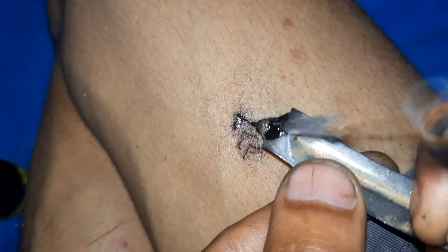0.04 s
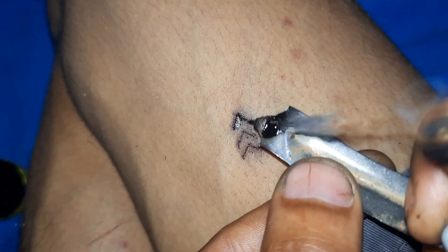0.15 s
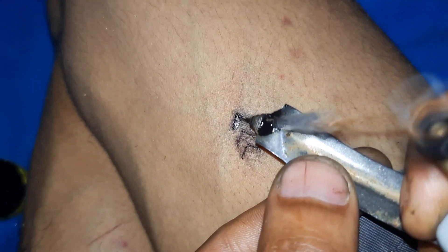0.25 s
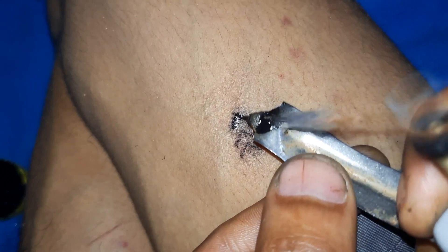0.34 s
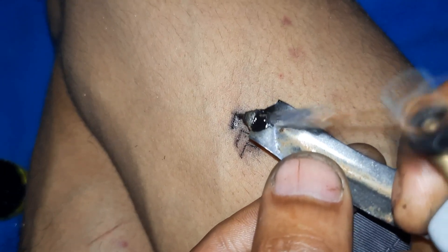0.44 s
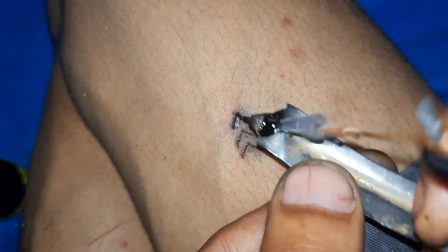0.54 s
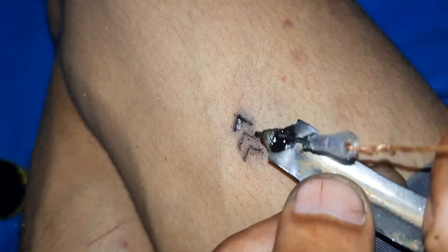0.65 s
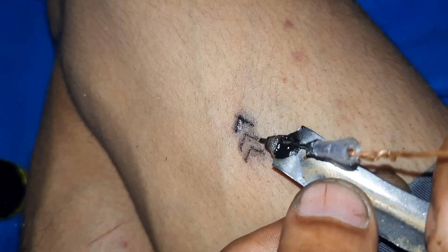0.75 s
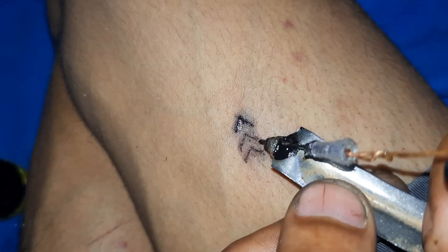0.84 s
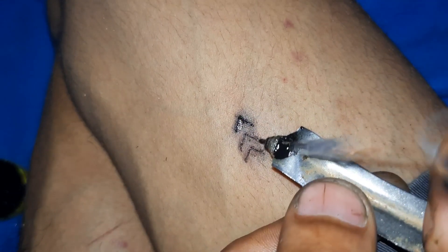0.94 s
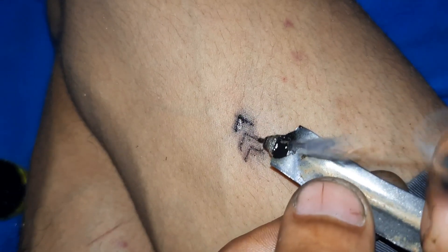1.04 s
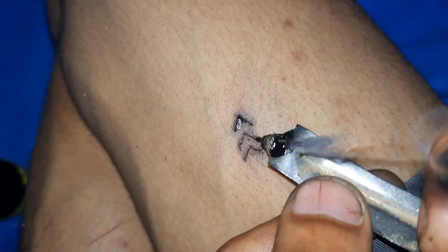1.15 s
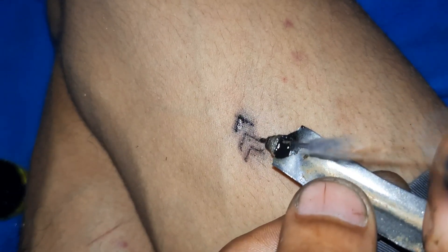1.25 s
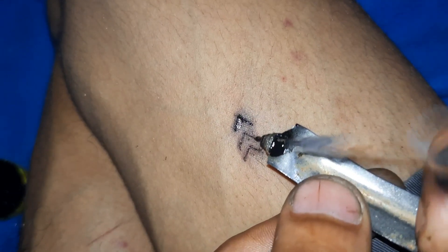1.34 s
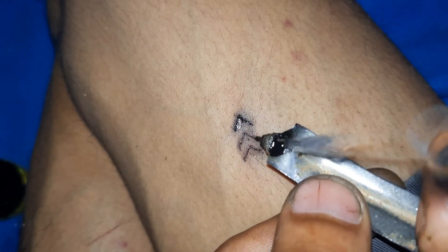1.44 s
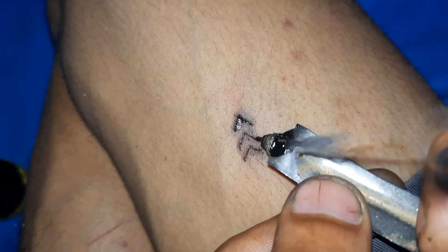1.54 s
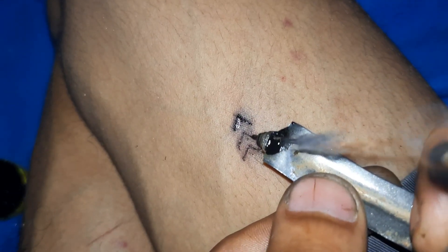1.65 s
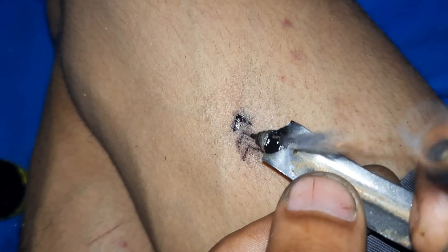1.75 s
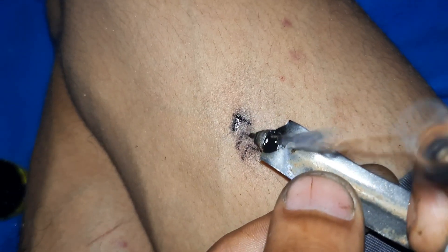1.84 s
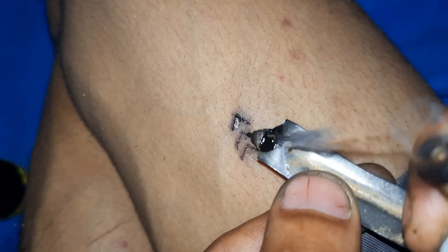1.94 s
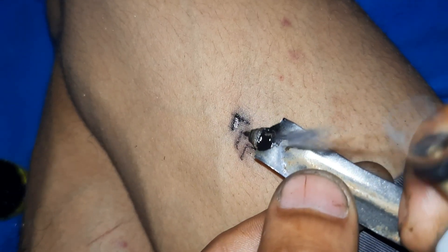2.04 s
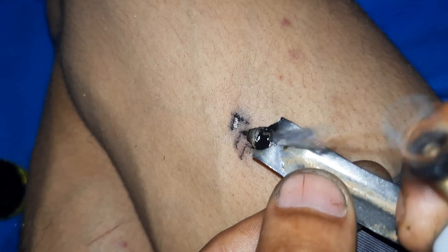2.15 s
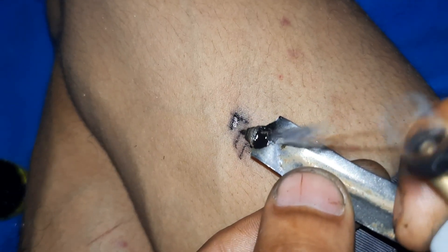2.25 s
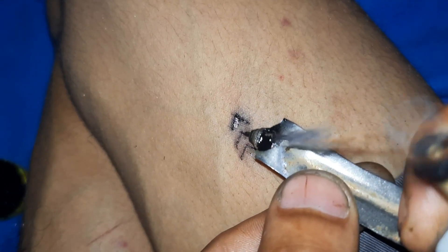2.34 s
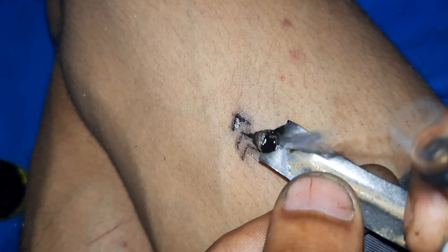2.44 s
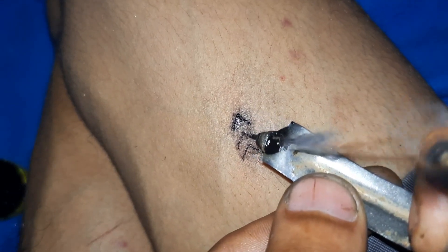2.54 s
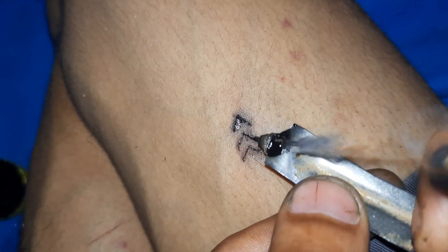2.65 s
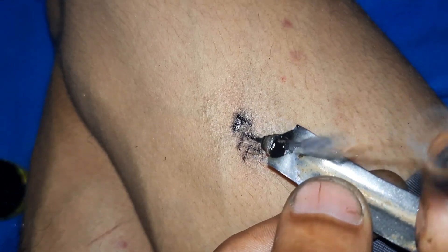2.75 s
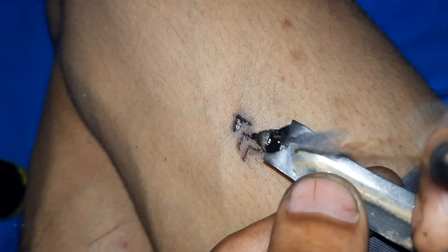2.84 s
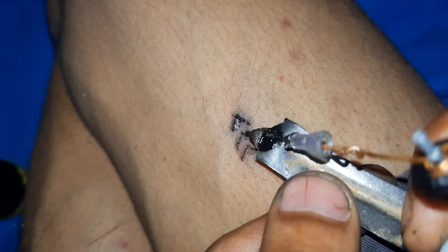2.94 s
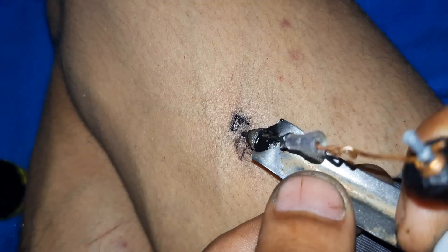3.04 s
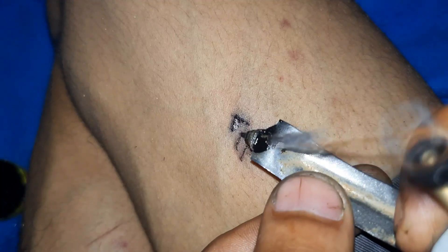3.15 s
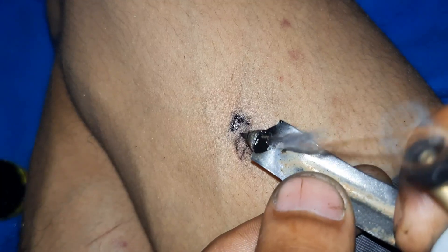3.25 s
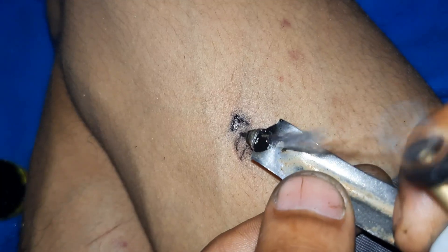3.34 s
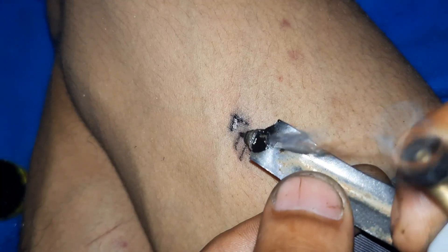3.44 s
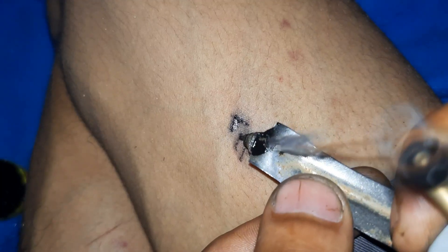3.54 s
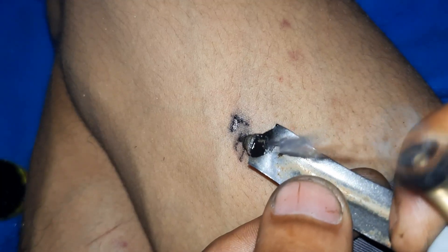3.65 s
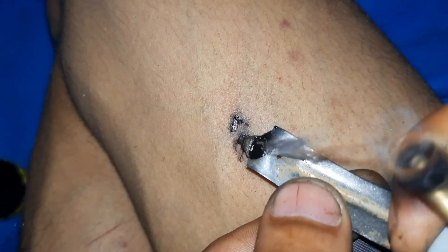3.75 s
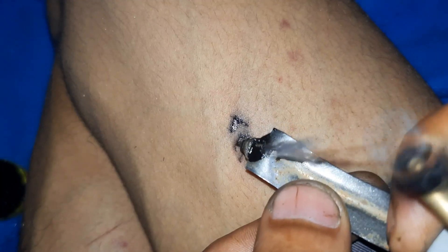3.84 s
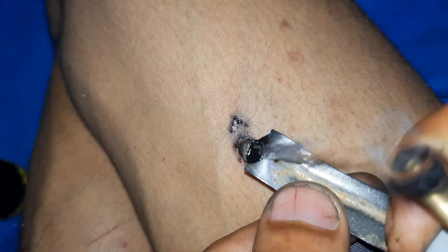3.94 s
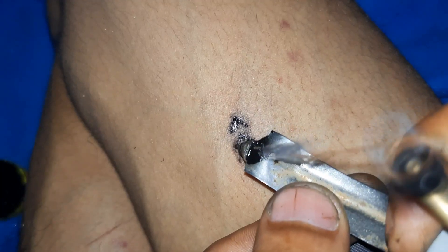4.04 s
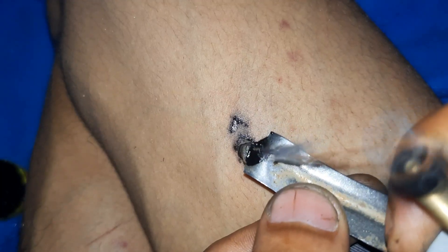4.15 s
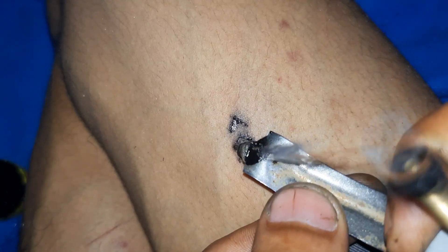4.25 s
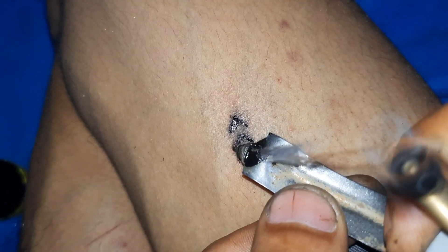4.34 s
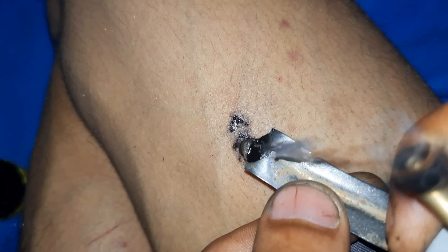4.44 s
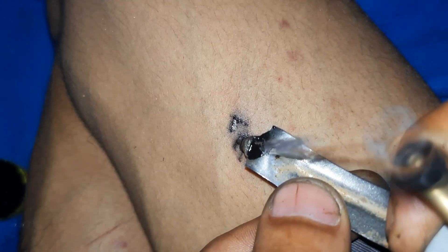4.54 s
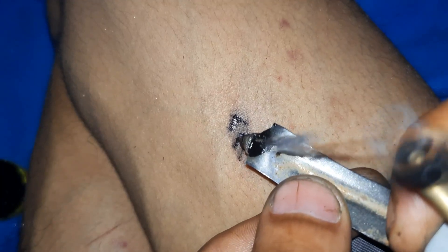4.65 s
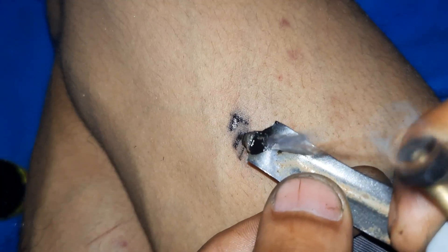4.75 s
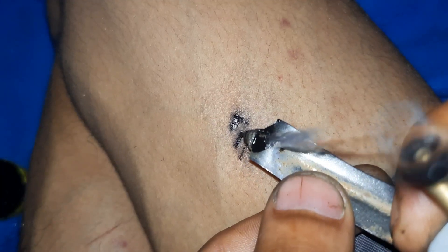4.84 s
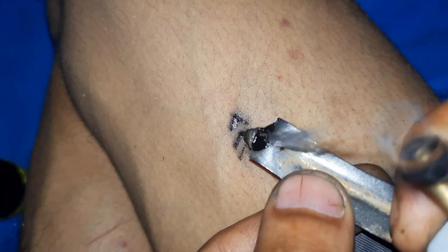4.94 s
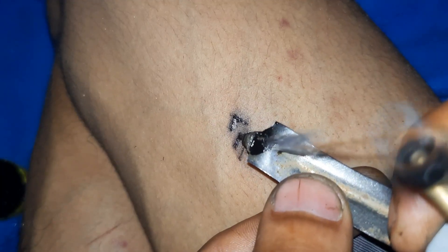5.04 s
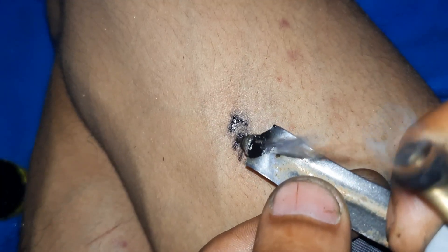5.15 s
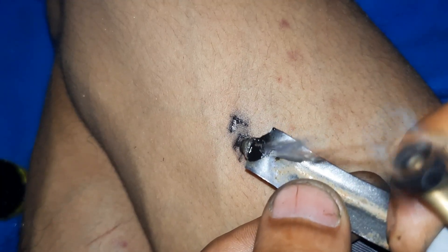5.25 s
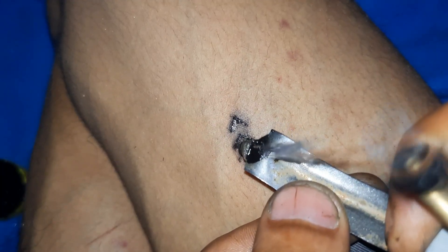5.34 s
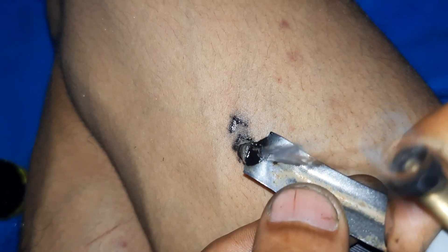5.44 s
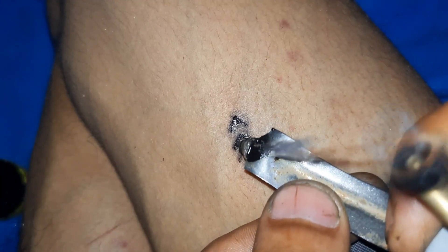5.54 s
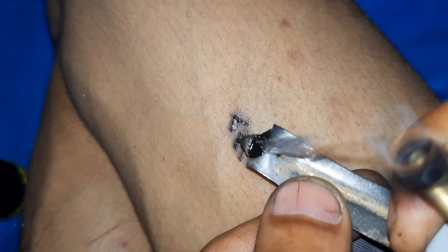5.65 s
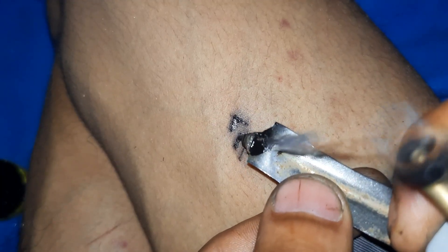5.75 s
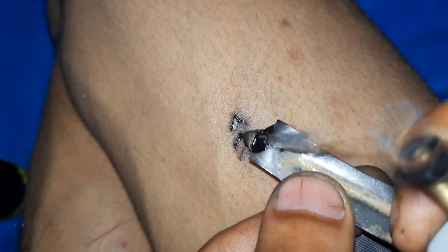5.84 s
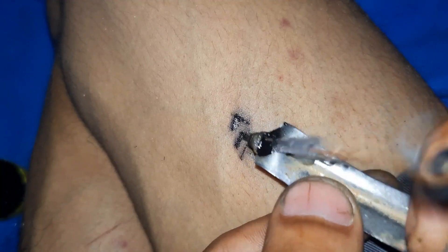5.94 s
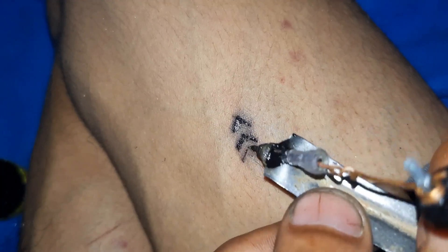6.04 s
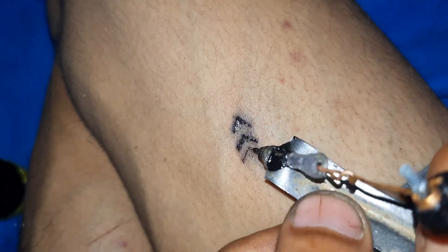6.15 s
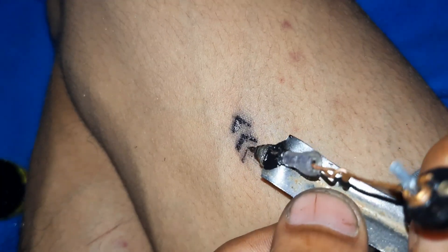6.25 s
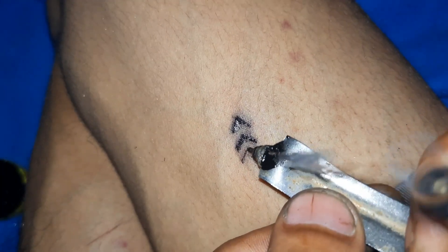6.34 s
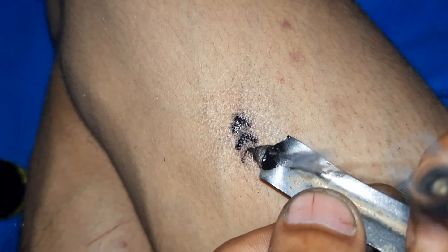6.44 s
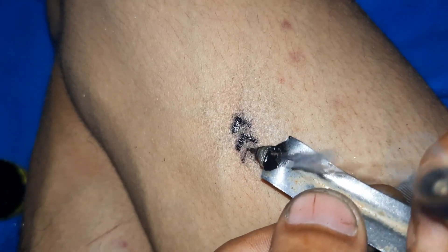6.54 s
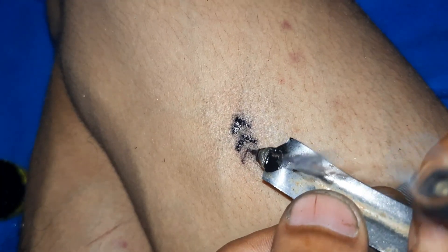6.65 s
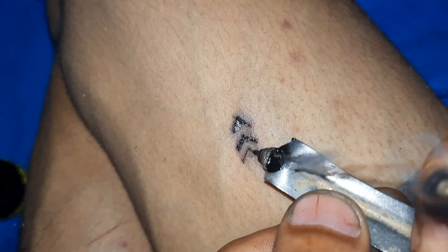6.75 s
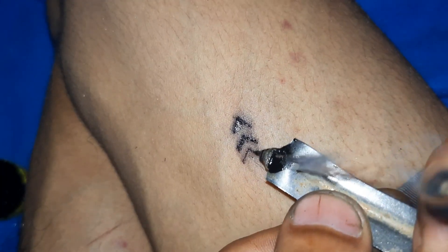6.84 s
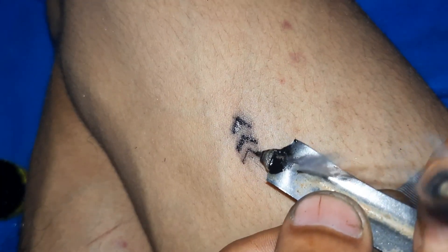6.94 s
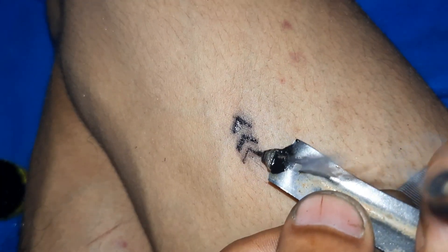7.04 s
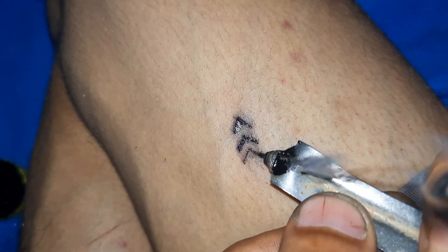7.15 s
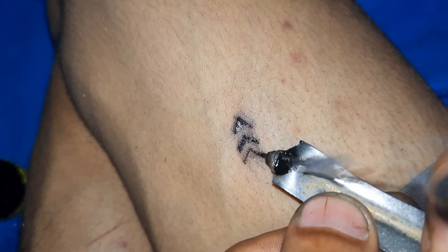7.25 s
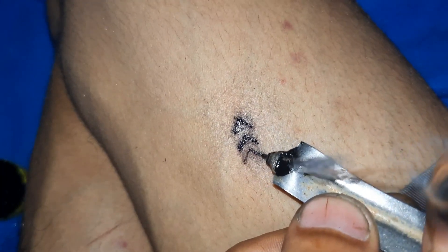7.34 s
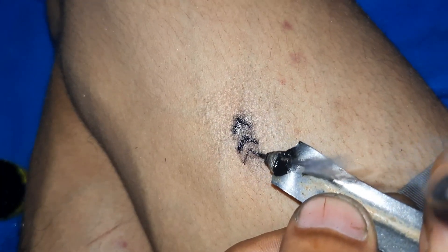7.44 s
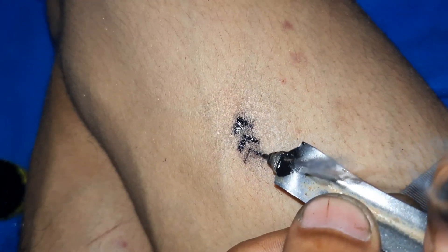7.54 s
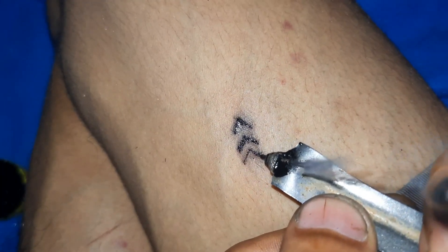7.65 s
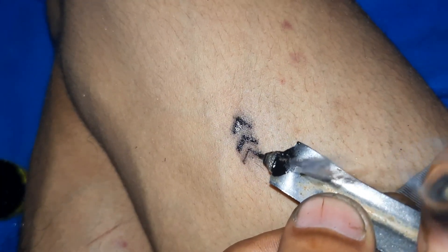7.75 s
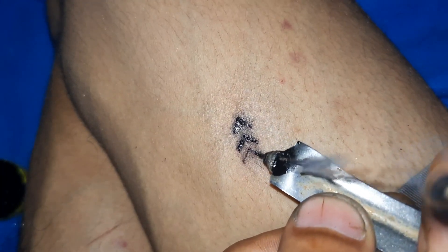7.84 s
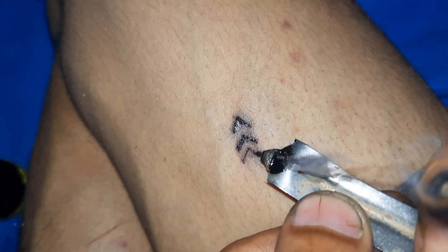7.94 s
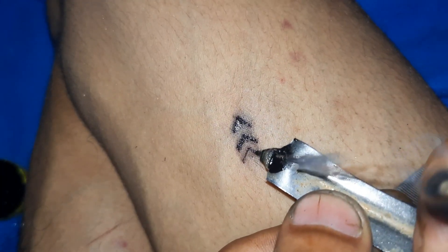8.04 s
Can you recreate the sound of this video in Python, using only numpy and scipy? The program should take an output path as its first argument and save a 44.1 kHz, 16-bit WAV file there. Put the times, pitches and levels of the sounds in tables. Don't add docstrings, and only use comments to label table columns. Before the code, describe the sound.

A small needle machine buzzes close by with a bright, hissing metallic rattle, cutting out three times, coasting to faint hum and restarting.

```python
import sys
import numpy as np
from scipy import signal
from scipy.io import wavfile
from scipy.ndimage import uniform_filter1d

SR = 44100
rng = np.random.default_rng(int(sys.argv[2]) if len(sys.argv) > 2 else 0)


def how_loud(loudness_db):
    steps = np.asarray(loudness_db, float) / 20
    return 10 ** steps


def generate_wav(signal):
    frames = np.transpose(np.atleast_2d(signal))
    scaled = np.clip(frames, -1, 1) * 32767
    pcm = np.round(scaled).astype(np.int16)
    wavfile.write(sys.argv[1], SR, pcm)


N = 357651

# first slap in seconds, switch-off in seconds,
# speed at the first slap in turns per second, spin-up time in seconds, blow level in dB.
RUNS = [
    (.005, 0.547, 135, .0001, -30.2),
    (0.9693, 2.9, 81, .018, -30),
    (3.1672, 5.979, 68, .03, -29),
    (6.3936, 8.2, 98, .014, -29.6),
]
# time in seconds, speed in turns per second.
CRUISE_SPEED = [(0, 146.9), (.14, 146.5), (.28, 145.1), (.54, 143.6), (1.05, 139.5), (1.3, 143.6),
                (1.45, 142.6), (2.2, 142.8), (2.8, 144.), (3.35, 142.6), (3.78, 144.5), (4.2, 143.2),
                (4.72, 144.7), (5.5, 144.4), (6.0, 145), (6.5, 143.3), (7.0, 144.7), (8.11, 144.8)]
# place in the turn from 0 to 1, level in dB,
# scatter of place in turns, scatter of level in dB.
KNOCKS = [
    (.17, -6, .02, 1),
    (0.299, -9.5, .04, 1.5),
    (.47, -6, .03, 1.5),
    (0.601, -18.5, .04, 3),
    (0.799, -25.5, 0.054, -4),
]
# pitch in Hz, width in Hz, level in dB.
BAR_RINGS = [(10780, 560, 9.5), (15550, 370, -2), (5974, 200, 3.5), (3877, 270, -4), (2325, 220, -1.5)]
# frequency in Hz, gain in dB.
PATH_LEFT = [(100, -50), (300, -36.5), (900, -45.5), (1800, -36.5), (2300, -31), (3600, -11.5),
             (5000, -21.5), (6000, -16), (6500, -17), (8500, -4), (10000, -7), (12000, -15), (14300, -7.5),
             (15600, -9.5)]
PATH_RIGHT = [(40, -30.5), (150, -17), (600, -22.5), (1200, -27.5), (2300, -19.5), (3600, -12), (5000, -13),
              (6000, -18.5), (6500, -6.5), (8300, 2.5), (9500, -1.5), (12000, -6.5), (14400, -1.5),
              (15600, -7)]
# frequency in Hz, gain in dB.
SLAP_LEFT = [(500, -7.5), (3000, 2), (6000, -7), (8700, 13), (10500, 9), (14000, 0.5)]
SLAP_RIGHT = [(500, 7.5), (3000, 2), (6000, 4.5), (8700, 3), (10800, 13.3), (14400, 15.2)]
# multiple of the crank speed, level in dB.
CRANK_ORDERS = [(1, 2.5), (2, -6), (3, -7), (4, -7), (5, -8), (6, -11), (7, -16), (8, -24), (9, -22),
                (10, -9.5), (11, -12), (12, -11), (13, -13.5), (14, -22.5), (15, -17), (16, -4.5), (17, -4),
                (18, -14.5)]
# frequency in Hz, gain in dB.
WALL_COLOUR = [(300, 2.5), (3000, -0.5), (8000, -4), (11000, -11), (14500, -0.5)]
# frequency in Hz, gain in dB.
AIR_COLOUR = [(24, -63.5), (40, -31), (87, -16), (166, -1), (193, -13), (242, -14.5), (289, 2),
              (983, -14.5), (1500, -11), (2300, -21), (15800, -26.5)]
# frequency in Hz, level in dB.
MAINS_HUM = [(100, -99), (200, -85), (400, -84.5), (600, -99), (800, -99)]
# centre in seconds, half length in seconds, rise in dB.
DRONE_SWELLS = [
    (.2, .25, 6),
    (1.5, .35, 11),
    (2.5, .4, 12),
    (3.07, .04, 12.5),
    (4.8, 1.4, 12),
    (6.13, 0.033, 14),
    (6.33, .03, 8),
    (6.999, .6, 17),
]
# low edge in Hz, high edge in Hz, gain at the left in
# dB, gain at the right in dB.
THINNED_BANDS = [
    (6400, 7100, -11.5, -10),
    (7093, 8000, -12.5, -14),
]
FULL_MOMENTS = [.068, 1.296, 1.642, 1.799, 1.885, 2.078, 2.8, 3.456, 6.455]
# frequency in Hz, chance from 0 to 1.
LOST_LEFT = [(1500, .02), (2800, .07), (3400, .01), (4900, .14), (5300, .02), (6200, .02), (6400, .4),
             (6900, .3), (7300, .55), (7800, .7)]
LOST_RIGHT = [(1500, 0), (2600, 0), (3000, .02), (4600, .02), (5100, .07), (5600, .02), (6900, .03),
              (7400, .06), (7600, .3), (7800, .4)]
LOST_SHARED = [(2600, .03), (3000, .0), (3900, .05), (4300, .08), (5500, .08), (5900, .0), (7200, .02),
               (7750, .4)]
# start in seconds, end in seconds,
# share of patches lost from 0 to 1.
SHARED_LOSS_SPELLS = [(0, .05, 1), (.13, .28, .75), (1.08, 1.2, .6), (1.43, 1.5, .5), (1.52, 1.64, .9),
                      (1.75, 1.82, 1), (1.94, 2.38, .4), (2.5, 2.55, 1), (2.88, 2.94, 1), (3.21, 3.34, 1),
                      (3.36, 3.57, 1), (3.57, 3.78, .6), (3.94, 4.03, .8), (4.12, 4.72, .3),
                      (4.82, 4.92, 1), (4.98, 5.33, .8), (5.4, 5.57, .7), (6.41, 6.72, .55),
                      (6.79, 6.87, .6), (7.39, 7.44, 1)]


def evened(x):
    return x / np.sqrt(np.mean(x ** 2) + 1e-20)


def read(points, hz):
    f, value = np.transpose(points)
    return np.interp(np.log(hz + 1), np.log(f + 1), value)


def colour(x, points):
    hz = abs(np.fft.fftfreq(4096, 1 / SR))
    log_gain = np.log(how_loud(read(points, hz)))
    response = np.exp(np.conj(signal.hilbert(log_gain)))
    taps = np.fft.ifft(response).real[:2048]
    return signal.oaconvolve(x, taps)[:N]


def resonate(x, hz, width):
    return signal.lfilter(*signal.iirpeak(hz, hz / width, SR), x)


def fading(x, seconds):
    return signal.lfilter([1], [1, -np.exp(-1 / (seconds * SR))], x)


def flutter():
    span = int(.06 * SR)
    drift = uniform_filter1d(rng.standard_normal(N), span)
    return evened(uniform_filter1d(drift, span))


def crank():
    coast_s, coast_bend, stop_hz = .074, 1.3, 15
    t = np.arange(N) / SR
    cruise = np.interp(t, *np.transpose(CRUISE_SPEED))
    turns, speed, blow, shake = np.zeros((4, N))
    for start, off, first_hz, spin_up, db in RUNS:
        since = t - start
        coast = np.exp(-(np.maximum(t - off, 0) / coast_s) ** coast_bend)
        missing_hz = np.maximum(cruise - first_hz, 0) * np.exp(-np.maximum(since, 0) / spin_up)
        hz = (cruise - missing_hz) * coast
        on = (since > -.48 / first_hz) & (hz > stop_hz)
        since, coast = since[on], coast[on]
        from_rest = start > .1
        speed[on] = hz[on]
        turns[on] = np.cumsum(hz[on]) / SR
        turns[on] += 1 - np.interp(0, since, turns[on])
        slow_db = -2.5 * (1 / coast - 1) ** 1.52
        catch_db = from_rest * -15 * np.exp(-since / 0.011)
        blow[on] = how_loud(db + slow_db + catch_db)
        swing_db = -35 * from_rest * (1 - np.clip(since / (2.84 * spin_up), 0, 1) ** 1.5)
        shake[on] = how_loud(db - 27 - 60 * (1 - coast) + swing_db)
    return turns, speed, blow * how_loud(.5 * flutter()), shake * how_loud(0.64 * flutter())


def blows(turns, speed, place, db, scatter, scatter_db):
    passes = np.diff(np.floor(turns - place)) == 1
    at = np.flatnonzero(passes & (speed[:-1] > 0))
    chance = np.clip(rng.standard_normal((2000, 2))[:len(at)], -2, 1.5)
    shift = np.round(scatter * chance[:, 0] * SR / speed[at]).astype(int)
    at = np.clip(at + shift, 0, N - 1)
    train = np.zeros(N)
    train[at] = how_loud(db + scatter_db * chance[:, 1])
    return train


def needle_bar(turns, speed, blow):
    reach = np.minimum(speed / 134, 1) ** .7
    slaps = blow * reach * blows(turns, speed, 0, db=11, scatter=.003, scatter_db=1.23)
    knocks = blow * sum(blows(turns, speed, place, 18.0 + db, scatter, scatter_db)
                        for place, db, scatter, scatter_db in KNOCKS)
    shared, own_left, own_right = rng.standard_normal((3, N))
    grit = how_loud(2.5 * np.minimum(rng.exponential(1, N // 16 + 1), 4)).repeat(16)[:N]
    chatter = how_loud(-16) * fading(slaps + knocks, 0.0023) + how_loud(-8) * blow * speed / 144
    rebound = resonate(np.roll(slaps, 44), 2500, 2300)
    alike = how_loud(6.0) * slaps + how_loud(2) * rebound
    # path, slap colour, own grain, lag in samples, shared part, guide ring in Hz, width in Hz
    ports = ((PATH_LEFT, SLAP_LEFT, own_left, -1, .75, 8700, 900),
             (PATH_RIGHT, SLAP_RIGHT, own_right, -8, .9, 14400, 1500))
    heard = []
    for path, slap, own, lag, share, ring_hz, width in ports:
        grain = share * shared + np.sqrt(1 - share ** 2) * own
        crack = colour(alike + how_loud(-7) * grain * fading(slaps, 0.00037), slap)
        crack = crack + how_loud(1) * resonate(crack, ring_hz, width)
        rattle = grain * (fading(knocks, 0.00027) + chatter * evened(grit))
        rings = sum(how_loud(db) * resonate(rattle + alike, hz, ring_width) for hz, ring_width, db in BAR_RINGS)
        heard.append(np.roll(colour(crack + rattle + rings, path), lag))
    return np.array(heard)


def motor(turns, shake):
    wobble = rng.standard_normal((len(CRANK_ORDERS), N // 64 + 1))
    wobble = evened(uniform_filter1d(wobble, 24, axis=1))
    tones = np.zeros(N)
    for (order, db), drift in zip(CRANK_ORDERS, wobble):
        sign = -1 if order > 8.5 else 1
        level = how_loud(db + 1.42 * drift.repeat(64)[:N])
        cycles = order * (turns - .075) - 0.24 / order
        tones += sign * level * np.cos(2 * np.pi * cycles)
    near = np.sqrt(2) * uniform_filter1d(shake, 100) * tones
    left = colour(near, [(140, -42), (290, -26.0), (800, -32.5), (1800, -18.5), (2600, -0.5)])
    return np.array([left, how_loud(5) * near])


def walls(x):
    t = np.arange(SR // 4) / SR
    fade = how_loud(-60 * t / 0.12)
    tail = rng.standard_normal((2, len(t))) * fade * (t > .003)
    wet = signal.fftconvolve(x, tail / np.linalg.norm(tail[0]), axes=1)[:, :N]
    return np.array([colour(w, WALL_COLOUR) for w in wet])


def room_floor():
    t = np.arange(N) / SR
    air = np.array([colour(n, AIR_COLOUR) for n in rng.standard_normal((2, N))])
    hum = sum(how_loud(db) * np.sin(2 * np.pi * (hz * t + rng.random())) for hz, db in MAINS_HUM)
    swell_db = sum(db * np.exp(-((t - s) / half) ** 2) for s, half, db in DRONE_SWELLS)
    drone = how_loud(-91 + swell_db) * evened(resonate(rng.standard_normal(N), 292, 30))
    port_gain = how_loud(np.array([[-2.5], [2.]]))
    return (how_loud(-81) * evened(air) + hum + drone) * port_gain


def treble_is_loud(z, hz, t):
    top_power = (abs(z[:, hz > 9000]) ** 2).mean(axis=(0, 1))
    top_db = 10 * np.log10(top_power + 1e-20)
    away_s = np.min(abs(t[:, None] - np.array(FULL_MOMENTS)), axis=1)
    return (top_db > -85) & (np.roll(top_db, 1) > -75) & (away_s > .008)


def turn_down(x):
    hz, t, z = signal.stft(x, SR, nperseg=512)
    busy = treble_is_loud(z, hz, t)
    flicker = rng.random(len(t) // 4 + 1).repeat(4)[:len(t)] ** 2 - .25
    ragged = hz[:, None] - 300 * flicker
    for low_hz, high_hz, *cut_db in THINNED_BANDS:
        inside = busy & (ragged > low_hz) & (ragged <= high_hz)
        z = z * np.where(inside, how_loud(np.array(cut_db))[:, None, None], 1)
    z[:, hz > 15850] = 0
    return signal.istft(z, SR, nperseg=512)[1][:, :N]


def coarsen(x):
    window = signal.windows.kaiser_bessel_derived(2048, 4 * np.pi)
    hz, t, z = signal.stft(x, SR, window, nperseg=2048)
    low = treble_is_loud(z, hz, t) & ((hz > 2200) & (hz < 7950))[:, None]
    nearby = uniform_filter1d(abs(z) * (hz < 7900)[:, None], size=20, axis=1)
    size = abs(z) / (2.5 * nearby + 1e-9)
    z = np.where(low, z * np.round(size) / (size + 1e-9), z)
    luck = rng.random((3, len(hz) // 14 + 1, len(t) // 2 + 1))
    luck = luck.repeat(14, 1).repeat(2, 2)[:, :len(hz), :len(t)]
    centre_hz = hz[np.minimum(np.arange(len(hz)) // 14 * 14 + 7, len(hz) - 1)]
    chance = np.array([read(lost, centre_hz) for lost in (LOST_LEFT, LOST_RIGHT, LOST_SHARED)])
    empty = low & (luck < chance[..., None])
    z[empty[:2]] = 0
    spell = sum(share * ((t >= a) & (t <= b)) for a, b, share in SHARED_LOSS_SPELLS)
    spell_lost = (np.roll(luck[2], 8, 0) < spell) & ((hz > 3170) & (hz < 3790))[:, None]
    dropped = (empty[2] & (hz > 2500)[:, None]) | spell_lost
    z = z - dropped * z.mean(axis=0)
    return signal.istft(z, SR, window, nperseg=2048)[1][:, :N]


def scene():
    turns, speed, blow, shake = crank()
    machine = needle_bar(turns, speed, blow) + motor(turns, shake)
    return machine + how_loud(-14.5) * walls(machine) + room_floor()


def top_cut(x):
    return signal.sosfilt(signal.butter(12, 16960, fs=SR, output="sos"), x)


def record(dry):
    mix = coarsen(turn_down(dry))
    return top_cut(mix)


dry = scene()
out = record(dry)
generate_wav(out)
```